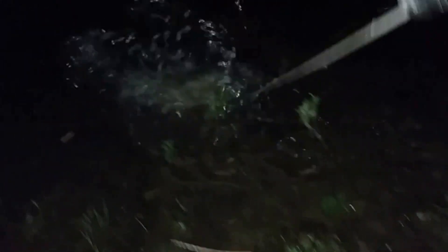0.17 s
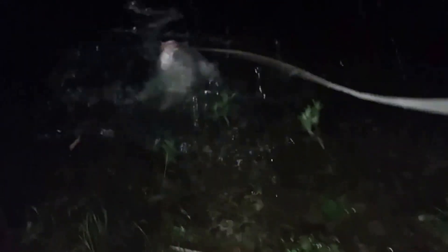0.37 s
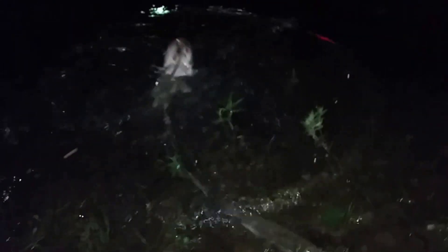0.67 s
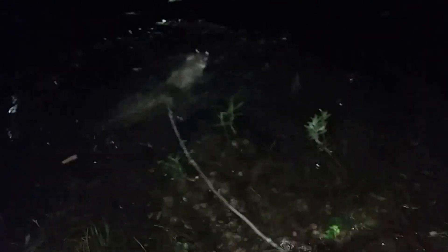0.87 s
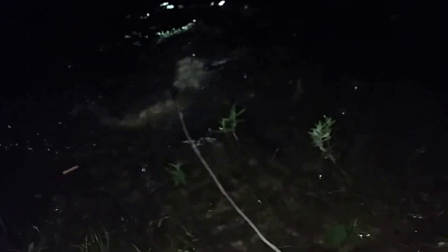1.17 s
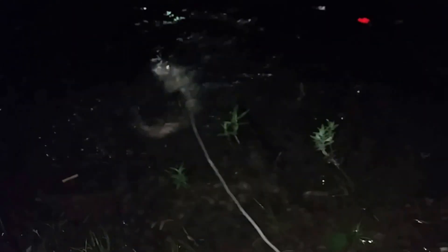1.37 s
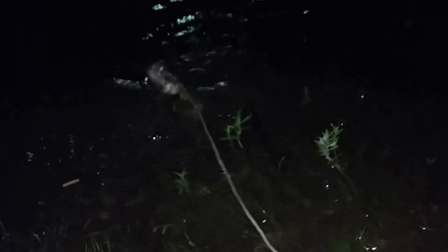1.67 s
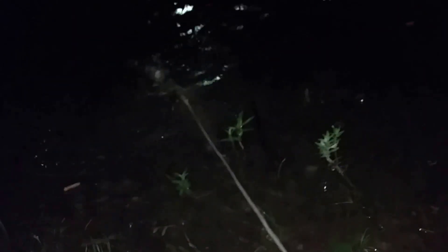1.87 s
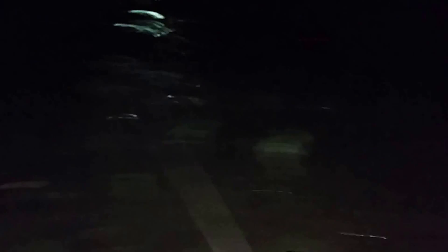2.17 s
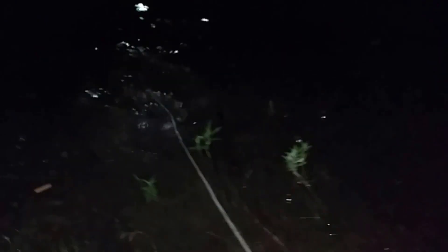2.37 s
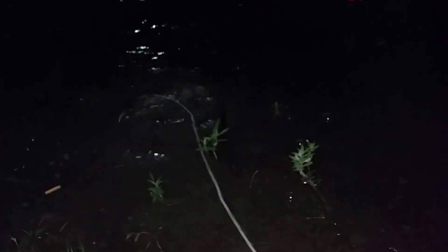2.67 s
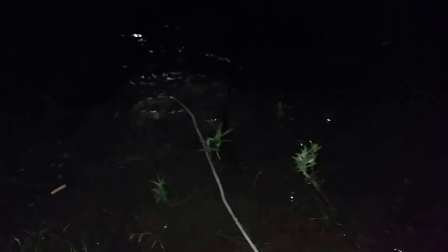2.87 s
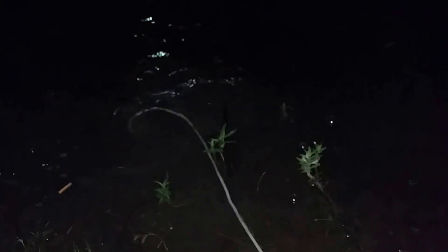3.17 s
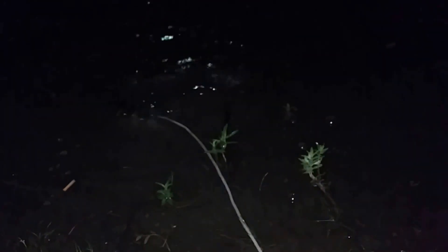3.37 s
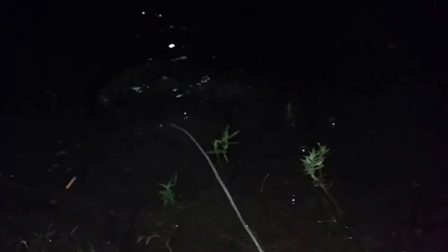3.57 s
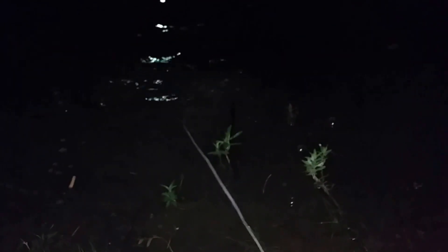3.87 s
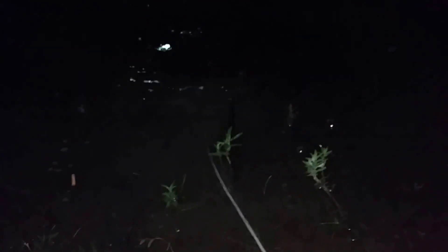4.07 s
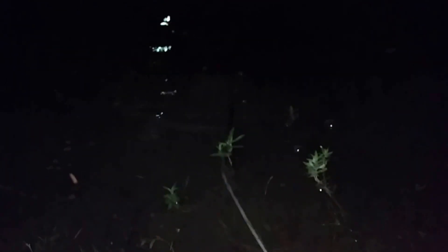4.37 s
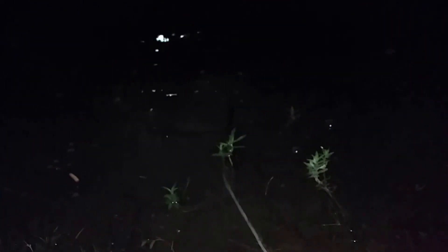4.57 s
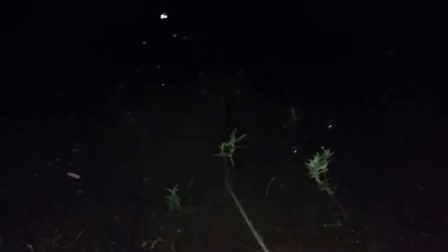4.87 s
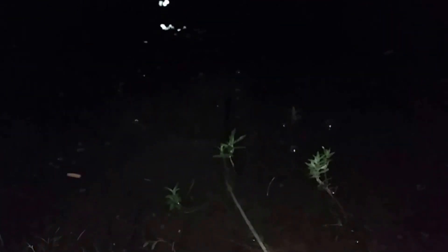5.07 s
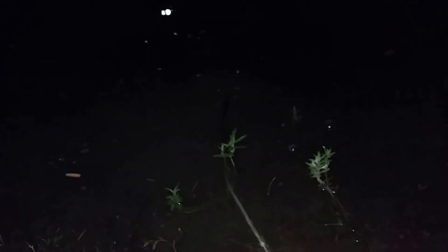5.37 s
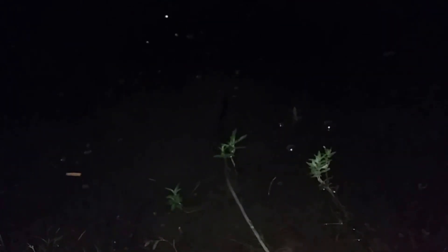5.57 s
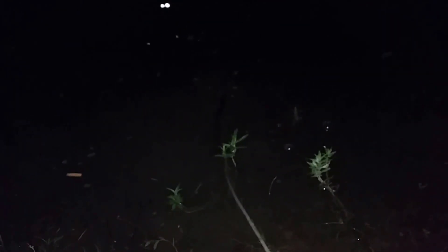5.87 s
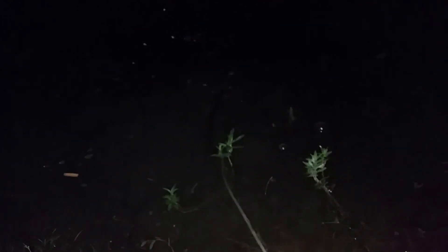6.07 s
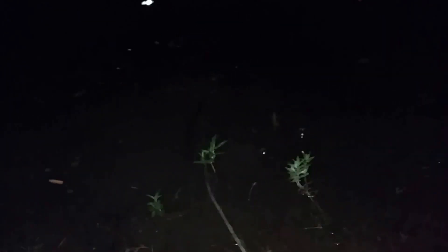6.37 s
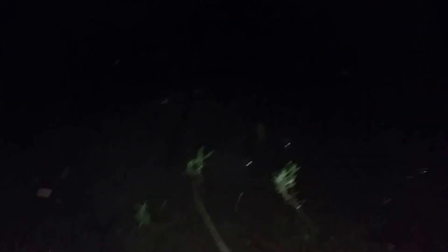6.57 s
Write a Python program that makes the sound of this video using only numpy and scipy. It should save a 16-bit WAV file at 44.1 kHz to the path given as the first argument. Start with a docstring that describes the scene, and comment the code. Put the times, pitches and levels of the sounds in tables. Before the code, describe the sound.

Close wet slap and double splash, bubbly plops gliding upward, fine bright droplets scattering, then only sparse ticks over a soft town rumble. A hard hollow thump with scraping bursts out on the phone itself, dulling the outdoors for about a second. Rumble and humming engine tones come back, a vehicle approaches far off, a thin hiss appears, and small taps close it.

```python
"""A fish on a rope splashes into a river at night: a slap, ringing bubbles, then spray thinning out to drops.
The splash is built from noise puffs, tiny pings and patter; each large bubble is a dying sine of rising pitch.
A hand knocks and rubs the phone (ringing modes, thumps and noise); after the heaviest knock the sound from
outside sinks and dulls, then returns. A thin high hiss sets in at 4.26 s; behind are a faint whistle, a far
vehicle that draws nearer, humming tones and a town's rumble, made from shaped noise and wavering sines."""
import sys
import numpy as np
from scipy import signal
from scipy.fft import rfft, irfft
from scipy.io import wavfile
from scipy.ndimage import map_coordinates

SR = 44100
rng = np.random.default_rng(int(sys.argv[2]) if len(sys.argv) > 2 else 0)


def bounce(signal):
    """Save signal as a 16-bit WAV file at the path given by the first command-line argument."""
    frames = np.transpose(np.atleast_2d(signal))
    limited = np.clip(frames, -1, 1)
    pcm = np.round(limited * 32767).astype(np.int16)
    wavfile.write(sys.argv[1], SR, pcm)


N = 296352
TIME = np.arange(N) / SR

# Surges of water: the plunge, the thrown spray landing, the fish wallowing.
# Each row: start in seconds, hold in seconds, fade in dB per second, churn level in dB, spray level in dB.
SURGES = [(0, .025, 115, -29.5, -27.5), (0.27, .45, 75, -49, -42.5), (.12, 0.27, 11, -49, -48.5)]
SURGE_RISE_DB_PER_S = 296
# Bursts of spray and slaps on the water. Each row: start in seconds, spray level in dB, churn level in dB,
# decay time constant in seconds, left minus right of the spray in dB.
SLAPS = [(.004, -18, -20.5, 0.0042, -4.5), (0.026, -43, -26, 0.0058, 1),
         (0.0791, -6.5, -12.5, 0.0044, -3.5), (0.753, -15, -40, 0.0011, 6), (0.7633, -12, -55, 0.0021, 12)]
# Colour of churning water. Each row: frequency in Hz, relative level in dB per Hz.
CHURN_COLOUR = [(100, -15), (300, -2.5), (560, -2), (850, -7), (1250, -3.5), (1600, -1), (2300, -2),
                (3000, -10.5), (6000, -22), (12000, -43.5)]
# Colour of spray. Each row: frequency in Hz, relative level in dB per Hz.
SPRAY_COLOUR = [(800, -23), (2400, -6.5), (3600, -10.5), (5000, -5.5), (7200, -5.5), (9500, -0.5),
                (13000, 2.5), (16000, -1.5)]
# Louder spray holds more droplets: their rate at a given level, and its power law with amplitude
DROPLETS_PER_S, DROPLETS_AT_DB, DROPLETS_POWER = 1200, -41, .9
# Spray lands in clumps: how often, and how unevenly
CLUMPS_PER_S, CLUMP_DB = 40, 2
# Large bubbles. Each row: start in seconds, level in dB, starting pitch in Hz, rise in octaves per second.
BUBBLES = [(.012, -23, 536, 3.2), (.022, -31, 920, 2), (.077, -24, 1220, 2), (.079, -20, 134, 6.1),
           (.116, -30.5, 1240, 6), (.135, -30, 623, 8.6), (.172, -34, 860, 13), (.192, -23, 272, 7),
           (.195, -33, 1330, 2.8), (.24, -31, 566, 4.5), (.258, -30.5, 662, 7.5), (.407, -31.5, 1260, 2.7),
           (.425, -34, 681.4, 6.6), (.537, -35.5, 1200, 1), (.727, -30.5, 937, 7), (1.4501, -30, 1194, 40)]
# A bubble's time to fall 60 dB at 1 kHz; higher bubbles die sooner by this power of pitch
BUBBLE_T60_S, BUBBLE_POWER = 0.069, 0.44
# Single drops and ticks. Each row: start in seconds, peak level in dB before panning, pitch in Hz,
# left minus right in dB.
DROPS = [(.16, -25, 9700, -4), (0.2807, -23.5, 12100, -4), (0.334, -20, 10400, 6), (0.365, -21, 12900, -9),
         (.533, -24.5, 11340, 0), (.5899, -20.5, 14070, 6), (0.686, -22.5, 12000, -3),
         (.7926, -21, 13900, 1), (.82, -29, 13560, 15), (0.8914, -27, 14100, 9), (.995, -30, 14500, 15),
         (1.0436, -29, 13500, 1), (1.1204, -28, 14400, 9), (1.566, -33, 13800, 0), (1.6154, -25, 13700, 11),
         (1.7539, -36, 14000, 12), (2.0853, -31.5, 13000, -2), (4.301, -25.5, 14500, -12),
         (4.5123, -32, 13500, -12)]

# Knocks on the phone. Each row: start in seconds, ring level in dB, hardness in dB per octave,
# thump level in dB, tick level in dB, left minus right of ring and tick in dB.
KNOCKS = [(2.1665, 1, -4, 10, -6.5, -3), (2.1801, -10, -3, -24, -20, -.5),
          (2.1956, -14, -0.5, -14, -14, -2), (2.2485, -35.5, 7.5, -20, -19, -30),
          (6.342, -20.5, 3, -18, -32, 16), (6.405, -7, 2, -40.5, -8.5, -5),
          (6.693, -17.5, 0.5, -36, -21.5, 15)]
# Ringing modes of the phone's body and ports. Each row: pitch in Hz, relative level in dB,
# time to fall 60 dB in seconds, left minus right in dB.
BODY_MODES = [(253.7, -15, 0.41, -28.5), (455.5, -32, 0.23, -9.5), (464, -6.5, 0.015, -8.5),
              (1004, -2, 0.0048, 24.5), (1965, -10.5, 0.006, 2.5)]
# Colour of skin on the casing. Each row: frequency in Hz, relative level in dB per Hz.
SKIN_COLOUR = [(100, 1.5), (1000, 6), (2200, 1), (4000, -1.5), (7000, -4.5), (11000, -7.5), (16000, 2.5)]
# A finger rubs across the right port. Each row: start in seconds, hold in seconds, level in dB.
RUBS = [(2.177, 0.0075, -35.5), (2.183, 0.057, -49), (2.231, .018, -28.5), (4.226, 0.019, -58),
        (6.69, 0.026, -46)]
RUB_RISE_DB_PER_S, RUB_FADE_DB_PER_S = 2200, 2397.5

# Colour of a thin high hiss. Each row: frequency in Hz, relative level in dB per Hz.
HISS_COLOUR = [(3000, -14), (5000, -2.5), (6200, 1), (7500, -13), (9000, -4.5), (12800, -6), (13800, 5),
               (15800, -1.5)]
HISS_S, HISS_HOLD_S, HISS_FADE_DB_PER_S = 4.26, 1.93, 14
HISS_DB, HISS_GROWTH_DB_PER_S = -54, 2
# Swells of a faint high whistle. Each row: loudest moment in seconds, half length in seconds, level in dB.
WHISTLE_SWELLS = [(4.633, 0.13, -70), (5.6, .17, -61.5), (6.0, 0.079, -60.5)]
# Its pitch sags from the loudest moment of its first swell on
WHISTLE_HZ, WHISTLE_SAG_HZ_PER_S = 10800, 350

# Colour of the far vehicle. Each row: frequency in Hz, relative level in dB per Hz.
VEHICLE_COLOUR = [(25, -10.5), (55, 7), (125, 5), (200, -10), (340, -21), (490, -11.5), (700, -17.5),
                  (1100, -30), (1350, -28), (2400, -36), (3000, -37.5), (5400, -38.5), (7500, -59.5),
                  (11000, -58), (16000, -54)]
# Its engine rumble peaks first, its tyres later
ENGINE_PEAK_S, ENGINE_HALF_S, ENGINE_DB = 5.57, 1.0, -29.5
TYRES_PEAK_S, TYRES_HALF_S, TYRES_DB = 6.4, 1.22, -22.5
TYRES_ABOVE_HZ = 440
# Far engine drones and tyre whines. Each row: loudest moment in seconds, half length in seconds,
# pitch in Hz, level in dB, wobble (its speed and its width) in Hz.
DRONES = [(0.5, 1.63, 120.1, -34, 3), (5.45, .65, 118.4, -29, 4), (1.106, 1.06, 71, -49, 6.1),
          (1.196, 1.06, 785, -50.5, 4.3), (2.093, 0.69, 1267, -53, 23.8), (3.957, 0.65, 820, -43.5, 113),
          (4.76, 0.32, 983, -47.5, 20), (5.524, 0.072, 468, -34, 11), (6.12, 0.14, 470.4, -39, 6.9),
          (5.697, 1.4, 1364, -53.5, 70), (6.442, .32, 907, -48, 4), (6.613, 0.23, 3850, -47, 410)]
# Colour of the night air by the river. Each row: frequency in Hz, relative level in dB per Hz.
NIGHT_COLOUR = [(25, -18), (58, -1), (125, -1.5), (195, -2), (344, -17), (820, -16.5), (1080, -25),
                (1280, -24), (1600, -34.5), (1900, -32), (2500, -41.5), (3820, -51.5), (5430, -35.5),
                (6600, -57), (8360, -62), (11500, -50.5), (14000, -44.5), (16000, -45.5)]
NIGHT_DB = -34

# Everything outside sinks after the heaviest knock, then returns
SINK_S, RETURN_S = 2.21, 3.092
# How bass, middle and treble sink, one row for each, before neighbouring bands are blended.
# Each row: depth in dB, sinking time constant in seconds, return time constant in seconds.
SINK_BANDS = [(12.31, 0.048, .15), (31.3, 0.39, 0.25), (43.2, 0.32, 0.39)]
# The two ports differ: the left is weak in the low treble and stronger near the top.
# Each row: frequency in Hz, left minus right in dB.
PORT_DIFFERENCE = [(60, 1.5), (200, 0), (700, -3), (1400, -4.5), (2400, -2.5), (3200, -10.5), (4500, -18.5),
                   (5600, -21.5), (8500, -17.5), (10500, -11), (12000, -3), (14000, 6.5), (16000, 1.5)]
TOP_HZ = 15750


def undb(db):
    """Turn decibels into gain."""
    return 10 ** (np.asarray(db) / 20)


def at(table, hz):
    """Read (Hz, value) points on a log-frequency axis."""
    f, value = np.transpose(table)
    return np.interp(np.log(hz + 1), np.log(f), value)


def colour(x, spectrum):
    """Filter by (Hz, dB) points, keeping the power of white noise."""
    gain = undb(at(spectrum, np.fft.rfftfreq(N, 1 / SR)))
    return irfft(rfft(x) * gain / np.sqrt(np.mean(gain ** 2)), N)


def ears(pan_db):
    """Give left and right gains whose mean is one; a positive pan favours the left."""
    gains = undb(np.array([np.atleast_1d(pan_db), -np.atleast_1d(pan_db)]) / 2)
    return gains / gains.mean(axis=0)


def walk(rate):
    """Draw a smooth random curve through so many points a second, with a spread near one."""
    knots = rng.standard_normal(int(N / SR * rate) + 2)
    return map_coordinates(knots, [TIME * rate], order=2, mode="nearest")


def add(out, s, sound):
    """Mix a sound in from time s on."""
    i = max(int(s * SR), 0)
    out[:, i:i + sound.shape[-1]] += sound[..., :N - i]


def swell(s, half_s):
    """Make a bell-shaped gain, one at time s."""
    return np.exp(-((TIME - s) / half_s) ** 2 / 2)


def envelope(s, hold_s, rise_db_per_s, fade_db_per_s):
    """Make a gain that rises to one at time s, holds and fades."""
    rise_db = (TIME - s) * rise_db_per_s
    fade_db = (s + hold_s - TIME) * fade_db_per_s
    return undb(np.clip(np.minimum(rise_db, fade_db), -200, 0))


def ring(hz, t60, octaves_per_s=0):
    """Make a dying sine, 60 dB down after t60 seconds, whose pitch may glide."""
    t = TIME[:int(t60 * SR) + 2]
    pitch = np.minimum(hz * 2 ** (octaves_per_s * t), SR / 2)
    return np.sin(2 * np.pi * np.cumsum(pitch) / SR) * np.exp(-np.log(1000) * t / t60)


def burst(decay_s, rise_s):
    """Make a short crackling puff of noise, its fine grain different at each port."""
    t = TIME[:SR // 10]
    # the crackle's level jumps at random every 10 samples
    steps = np.repeat(rng.standard_normal(len(t) // 10 + 1), 10)[:len(t)]
    crackle = undb(3.5 * steps - 1.4)
    shape = np.exp(-t / decay_s) * (1 - np.exp(-t / rise_s))
    return rng.standard_normal((2, len(t))) * crackle * shape


def patter(per_s, scatter_db, smear_s):
    """Make tiny impacts of unequal size, each a short fizz of noise; power near one."""
    hit = rng.random(N) < per_s / SR
    energy = undb(scatter_db * np.minimum(rng.exponential(size=N), 3)) ** 2
    impacts = hit * energy / (energy.mean() * per_s / SR)
    keep = np.exp(-2 / (smear_s * SR))
    # each impact's power dies away; the tiny floor keeps the root safe
    power = signal.lfilter([1 - keep], [1, -keep], impacts + 1e-18)
    return np.sqrt(power) * rng.standard_normal((2, N))


def grains(per_s, low_hz, high_hz, scatter_db, cycles, rise):
    """Ping droplets or small bubbles, each for some cycles at its own pitch and place; power near one."""
    out = np.zeros((2, N))
    starts = np.flatnonzero(rng.random(N) < per_s / SR)
    for i, (pitch, size, place, lag) in zip(starts, rng.random((len(starts), 4))):
        hz = low_hz + (high_hz - low_hz) * pitch
        ping = ring(hz, cycles / hz, rise * hz / cycles)
        size_gain = undb(scatter_db * (min(-np.log(size), 4) - 1.6))
        gain = size_gain * np.sqrt(SR / per_s[i] / np.sum(ping ** 2))
        left, right = gain * ears(10 * (place - .5))
        add(out[:1], i / SR, left * ping)
        # the right port hears it up to about 0.1 ms sooner or later
        add(out[1:], i / SR + 0.00021 * (lag - .5), right * ping)
    return out


def surges():
    """Follow the strength of churning water and of spray; the surges add in power."""
    power = 0
    for s, hold_s, fade_db_per_s, churn_db, spray_db in SURGES:
        shape = envelope(s, hold_s, SURGE_RISE_DB_PER_S, fade_db_per_s)
        power = power + np.outer(undb([churn_db, spray_db]), shape) ** 2
    return np.sqrt(power)


def splash():
    """The fish slaps the surface; water churns, small trapped bubbles ring, and spray falls back."""
    churning, spraying = surges() * undb(CLUMP_DB * walk(CLUMPS_PER_S))
    per_s = DROPLETS_PER_S * (spraying / undb(DROPLETS_AT_DB)) ** DROPLETS_POWER
    per_s = np.clip(per_s, 10, SR / 10)

    wash = patter(per_s / 4, scatter_db=-1.5, smear_s=0.0067) * undb(-2.0)
    froth = grains(per_s / 5, low_hz=405, high_hz=3090, scatter_db=3.0, cycles=22, rise=0.34) * undb(-10.5)
    churn = (wash + froth) * churning

    mist = patter(per_s / 2, scatter_db=2.0, smear_s=0.0029)
    droplets = grains(per_s, low_hz=8500, high_hz=16400, scatter_db=3.5, cycles=20, rise=0) * undb(-7.5)
    spray = (droplets + mist) * spraying
    spray = spray * ears(np.interp(TIME, [.45, .85], [3, -3][::-1]))  # the last drops land to the left

    for s, fizz_db, slap_db, decay_s, pan_db in SLAPS:
        add(spray, s, burst(decay_s, 0.00068) * undb(fizz_db) * ears(pan_db))
        add(churn, s, burst(decay_s, 0.00028) * undb(slap_db))
    return colour(churn, CHURN_COLOUR) + colour(spray, SPRAY_COLOUR)


def bubbles():
    """Large bubbles ring, the low ones longest, and rise in pitch as they near the surface."""
    out = np.zeros((2, N))
    for s, db, hz, rise in BUBBLES:
        t60 = BUBBLE_T60_S * (1000 / hz) ** BUBBLE_POWER
        add(out, s, ring(hz, t60, rise) * undb(db))
    return out


def drops():
    """Single drops tick on the water and the bank: tiny puffs of noise in a narrow band."""
    out = np.zeros((2, N))
    for s, db, hz, pan_db in DROPS:
        edges = [0.93 * hz, min(1.23 * hz, SR / 2 - 1000)]
        band = signal.butter(2, edges, "bandpass", fs=SR, output="sos")
        tick = signal.sosfilt(band, burst(decay_s=.0009, rise_s=.0001))
        peak = np.abs(tick.mean(axis=0)).max()
        add(out, s, tick / peak * undb(db) * ears(pan_db))
    return out


def knocks():
    """Knocks ring the phone's body and thump the right port; also returns their uncoloured ticks."""
    out, ticks = np.zeros((2, N)), np.zeros((2, N))
    # air squeezed into the port, slower as the skin gives way
    thump = -ring(hz=135, t60=0.021, octaves_per_s=-61)
    for s, ring_db, hardness_db, thump_db, tick_db, pan_db in KNOCKS:
        for hz, db, t60, mode_pan_db in BODY_MODES:
            # a harder knock favours the higher modes
            tilt_db = hardness_db * np.log2(hz / BODY_MODES[0][0])
            add(out, s, ring(hz, t60) * undb(ring_db + db + tilt_db) * ears(pan_db + mode_pan_db))
        add(out, s + 0.0011, thump * undb(thump_db) * ears(-27))
        add(ticks, s, burst(decay_s=0.00044, rise_s=.0001) * undb(tick_db) * ears(pan_db))
    return out, ticks


def rubs():
    """A finger drags over the right port: dense tiny impacts follow its pressure."""
    pressure = 0
    for s, hold_s, db in RUBS:
        pressure = pressure + envelope(s, hold_s, RUB_RISE_DB_PER_S, RUB_FADE_DB_PER_S) * undb(db)
    return patter(7300, scatter_db=0.8, smear_s=0.00069) * pressure * ears(-25.0)


def handling():
    """The hand's knocks and rubs join; ticks and rubs take on the colour of skin."""
    body, ticks = knocks()
    return body + colour(ticks + rubs(), SKIN_COLOUR)


def hiss():
    """A thin high hiss of shaped noise sets in abruptly, grows a little and fades."""
    growth = undb(HISS_DB + HISS_GROWTH_DB_PER_S * (TIME - HISS_S) + 1.1 * walk(6))
    gate = envelope(HISS_S, HISS_HOLD_S, rise_db_per_s=297, fade_db_per_s=HISS_FADE_DB_PER_S)
    return colour(rng.standard_normal((2, N)), HISS_COLOUR) * growth * gate


def whistle():
    """A thin far-off sine trembles in pitch, sags and swells."""
    hz = WHISTLE_HZ - WHISTLE_SAG_HZ_PER_S * np.maximum(TIME - WHISTLE_SWELLS[0][0], 0)
    gain = sum(swell(s, half_s) * undb(db) for s, half_s, db in WHISTLE_SWELLS)
    return np.sin(2 * np.pi * np.cumsum(hz + 70 * walk(250)) / SR) * gain


def far_noise(spectrum, unlike_hz, ripple_db):
    """Diffuse outdoor sound: long waves reach both ports alike, short ones do not."""
    hz = np.fft.rfftfreq(N, 1 / SR)
    likeness = .93 * np.sinc(hz / unlike_hz)  # first falls to zero at unlike_hz
    mid, side = rfft(rng.standard_normal((2, N)))
    side = side * np.sqrt((1 - likeness) / (1 + likeness)) * np.array([[1], [-1]])
    # echoes off water and banks leave narrow peaks and dips, mostly in the middle range
    knots = np.arange(0, SR / 2, 22)
    ripple = np.interp(hz, knots, rng.standard_normal(len(knots)))
    ripple = ripple * at([(200, 0), (450, 0.18), (2000, 1.0), (6000, 0.0014)], hz)
    return colour(irfft((mid + side) * undb(ripple_db * ripple), N), spectrum)


def vehicle():
    """A far vehicle nears: the engine's rumble swells first, the tyre noise follows."""
    noise = far_noise(VEHICLE_COLOUR, unlike_hz=2320, ripple_db=4.0) * undb(.5 * walk(9))
    lowpass = signal.butter(2, TYRES_ABOVE_HZ, fs=SR, output="sos")
    engine = signal.sosfiltfilt(lowpass, noise, padtype="even")
    tyres = (noise - engine) * ears(-2.5)  # a little to the right
    engine = engine * swell(ENGINE_PEAK_S, ENGINE_HALF_S) * undb(ENGINE_DB)
    return engine + tyres * swell(TYRES_PEAK_S, TYRES_HALF_S) * undb(TYRES_DB)


def drones():
    """Tones of far machines waver in pitch and level as they swell and fade."""
    out = 0
    for s, half_s, hz, db, wobble_hz in DRONES:
        knots = np.arange(0, N / SR + 1, 1 / wobble_hz)
        sway = np.interp(TIME, knots, rng.standard_normal(len(knots)))
        phase = 2 * np.pi * np.cumsum(hz + .5 * wobble_hz * sway) / SR
        # shifted by a second, the same sway moves the level apart from the pitch
        level = undb(db + 2 * np.roll(sway, SR))
        out = out + swell(s, half_s) * level * np.sin(phase)
    return out


def night():
    """The town's rumble in the night air: diffuse shaped noise whose level drifts a little."""
    noise = far_noise(NIGHT_COLOUR, unlike_hz=2400, ripple_db=0.5)
    return noise * undb(NIGHT_DB + 0.31 * walk(7.6))


def sink(x):
    """The sound sinks and dulls for a while: the treble falls furthest and comes back last."""
    hz, s, frames = signal.stft(x, SR, nperseg=512)
    sinking = np.clip(s, SINK_S, RETURN_S) - SINK_S
    returning = np.maximum(s - RETURN_S, 0)
    bass, middle, treble = (-depth_db * (1 - np.exp(-sinking / down_s)) * np.exp(-returning / up_s)
                            for depth_db, down_s, up_s in SINK_BANDS)
    # even the lowest bass takes a small share of the middle's fall
    to_middle = at([(170, 0.064), (1500, 1.0)], hz)[:, None]
    to_treble = at([(1500, 0), (7500, 1.0)], hz)[:, None]
    db = bass + (middle - bass) * to_middle + (treble - middle) * to_treble
    return signal.istft(frames * undb(db), SR)[1][:, :N]


def scene():
    """The river and its background sink together; the hand's sounds on the phone do not."""
    water = splash() + bubbles() + drops()
    background = hiss() + whistle() + vehicle() + drones() + night()
    return sink(water + background) + handling()


def record(dry):
    """Each port colours the sound; the loudest peaks are rounded off; the top is cut."""
    ports = ears(at(PORT_DIFFERENCE, np.fft.rfftfreq(N, 1 / SR)))
    ports = ports / np.sqrt(np.mean(ports ** 2, axis=0))
    heard = irfft(rfft(dry) * ports, N)
    # the microphones overload on the heaviest knock
    clipped = .95 * heard / (1 + heard ** 6) ** (1 / 6)
    return signal.sosfilt(signal.ellip(10, .2, 80, TOP_HZ, fs=SR, output="sos"), clipped)


dry = scene()
out = record(dry)
bounce(out)
```